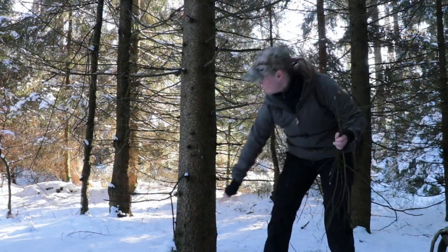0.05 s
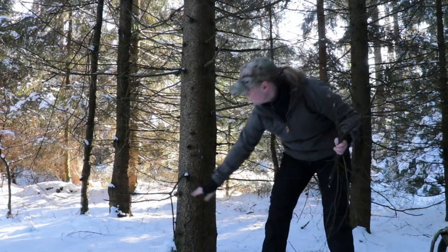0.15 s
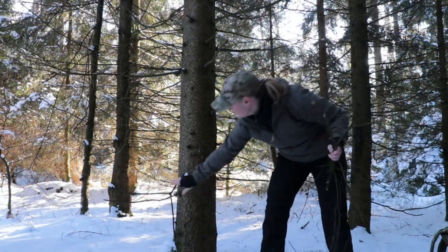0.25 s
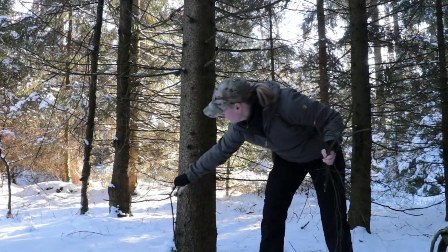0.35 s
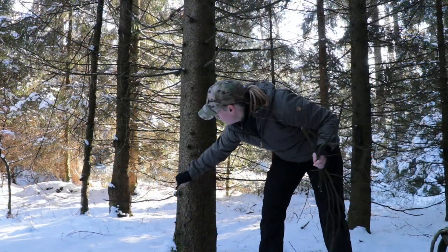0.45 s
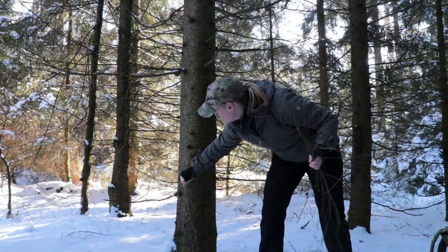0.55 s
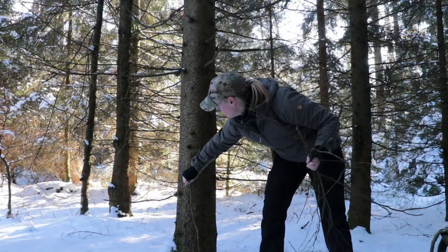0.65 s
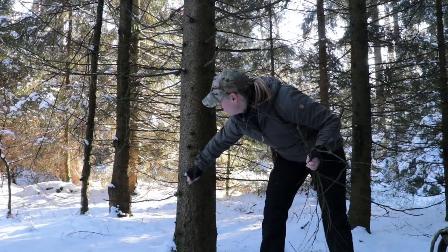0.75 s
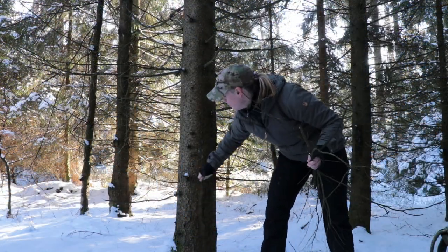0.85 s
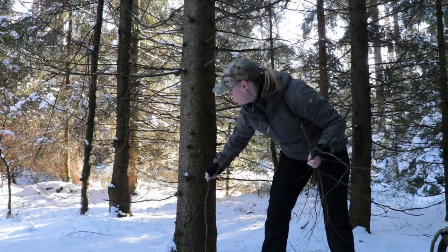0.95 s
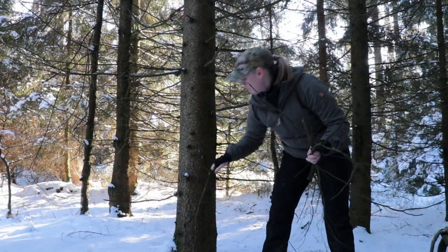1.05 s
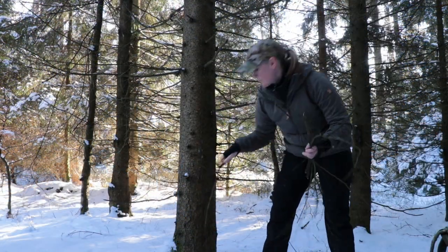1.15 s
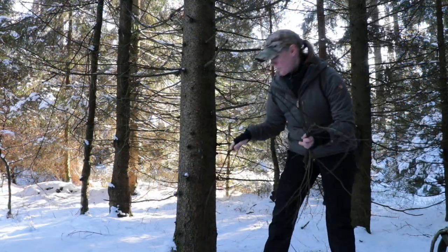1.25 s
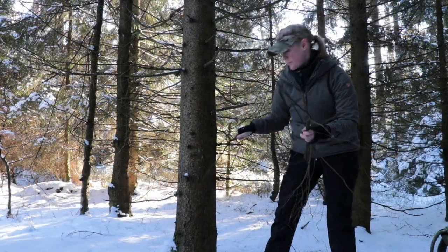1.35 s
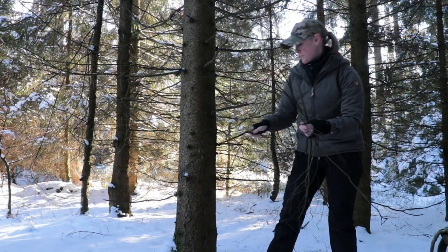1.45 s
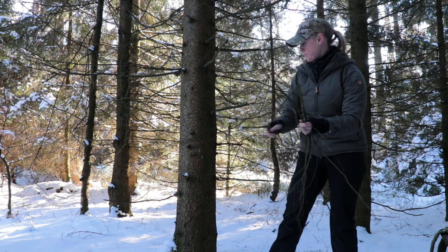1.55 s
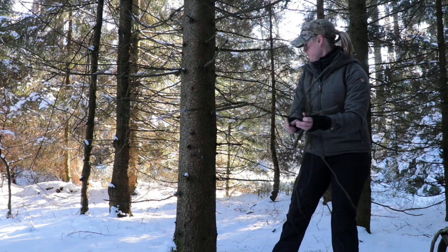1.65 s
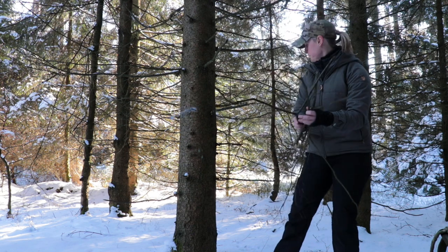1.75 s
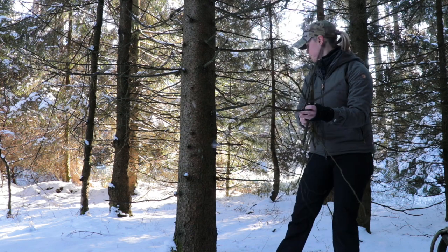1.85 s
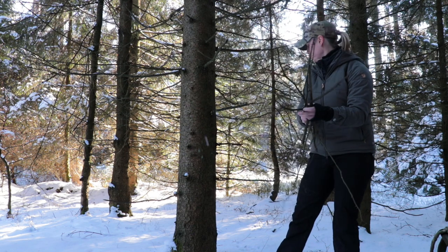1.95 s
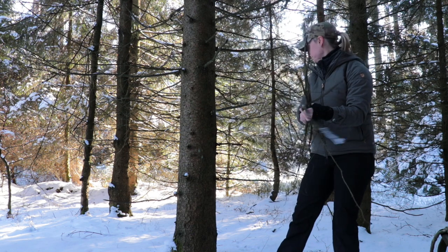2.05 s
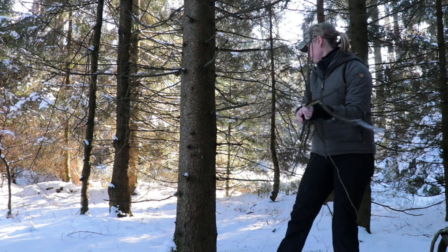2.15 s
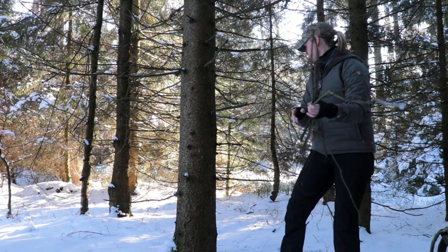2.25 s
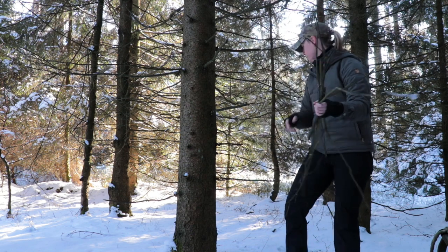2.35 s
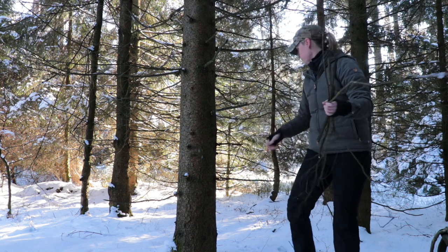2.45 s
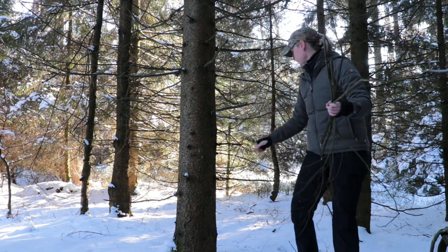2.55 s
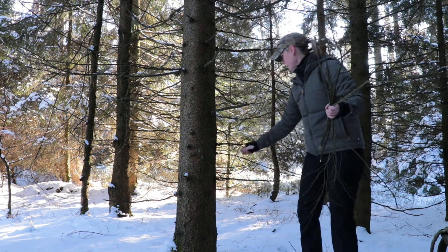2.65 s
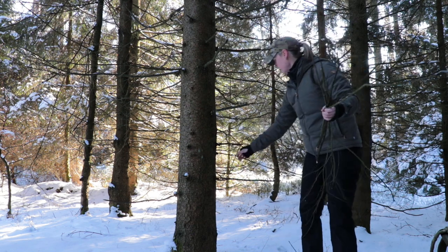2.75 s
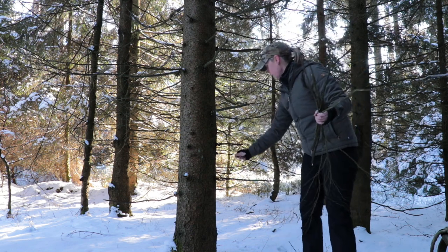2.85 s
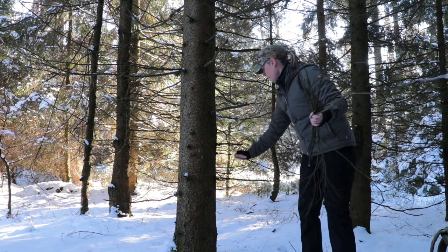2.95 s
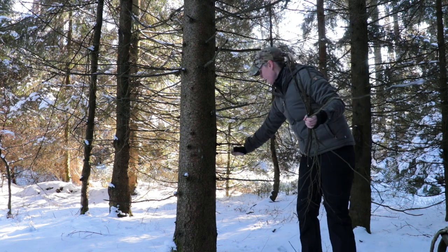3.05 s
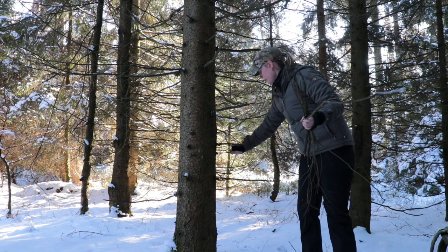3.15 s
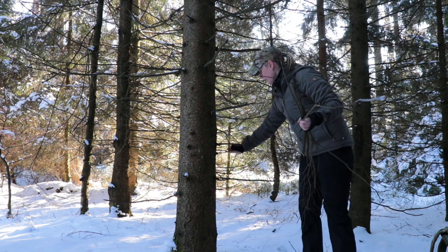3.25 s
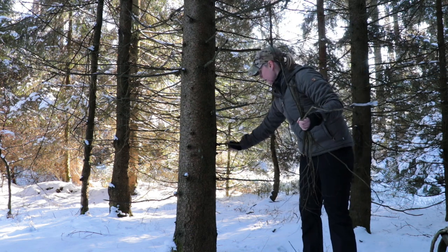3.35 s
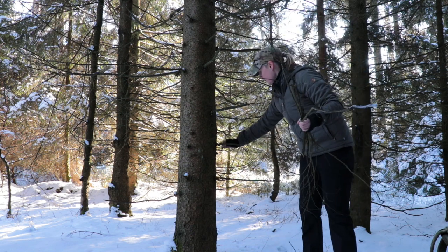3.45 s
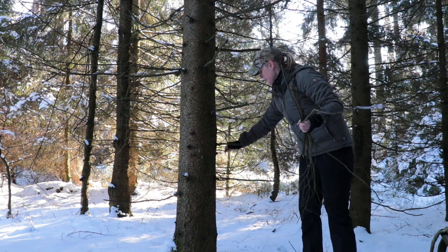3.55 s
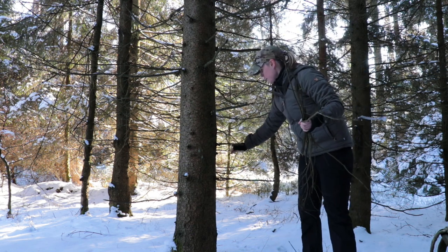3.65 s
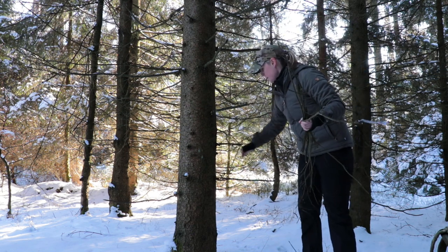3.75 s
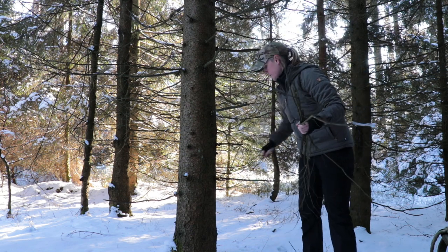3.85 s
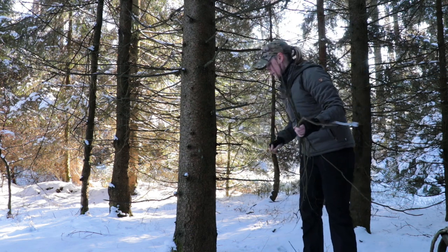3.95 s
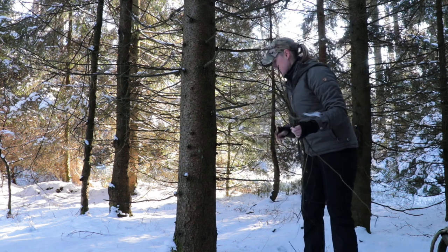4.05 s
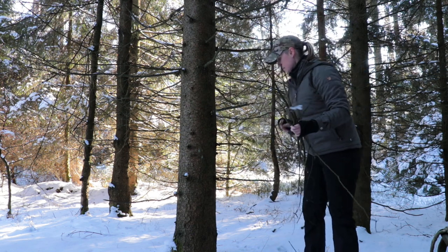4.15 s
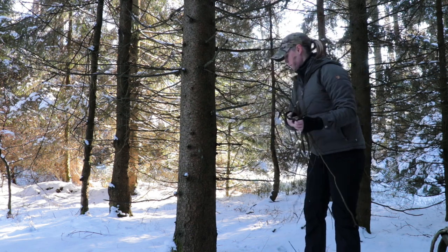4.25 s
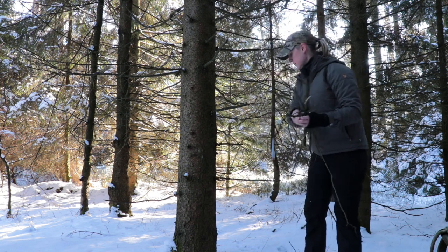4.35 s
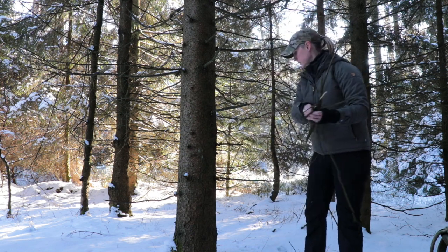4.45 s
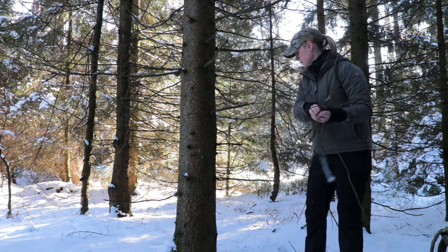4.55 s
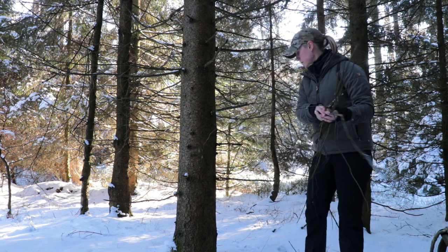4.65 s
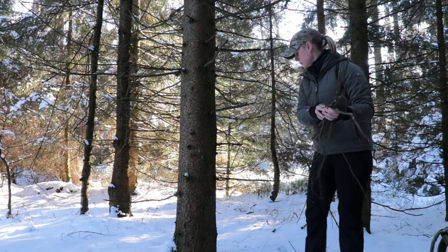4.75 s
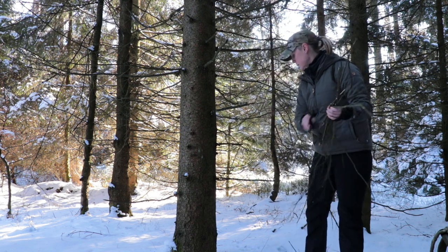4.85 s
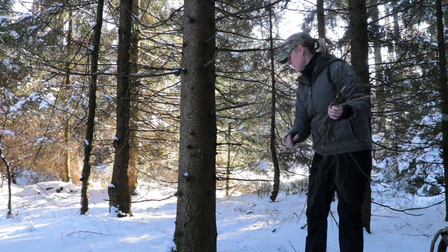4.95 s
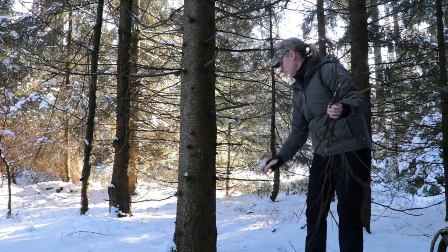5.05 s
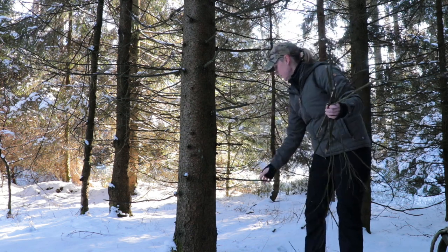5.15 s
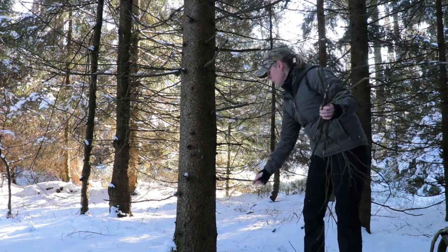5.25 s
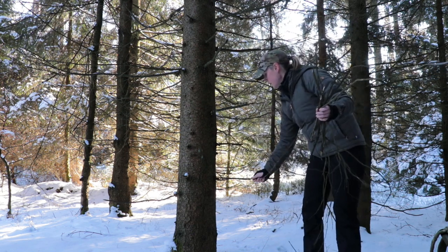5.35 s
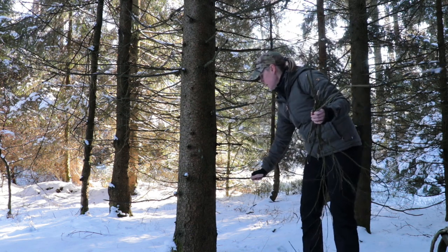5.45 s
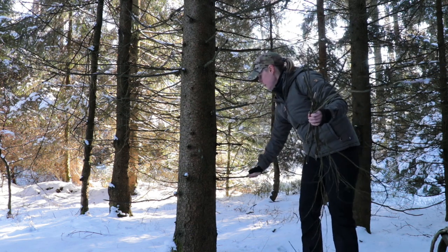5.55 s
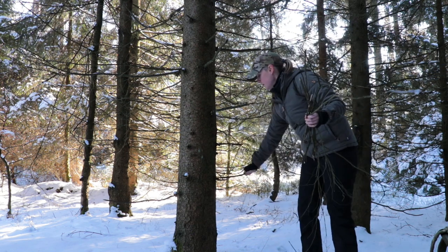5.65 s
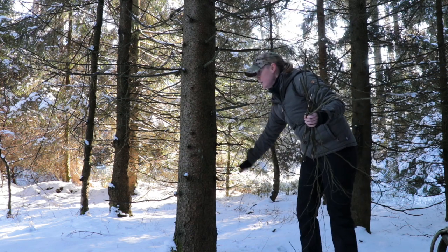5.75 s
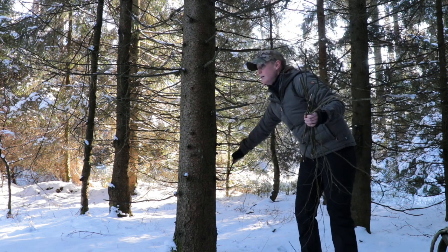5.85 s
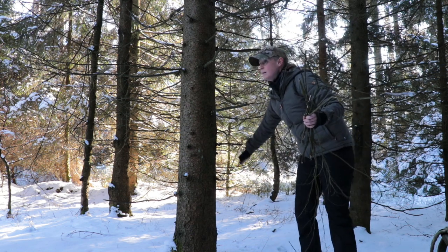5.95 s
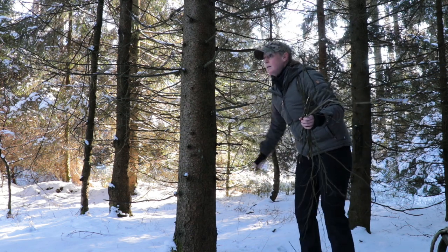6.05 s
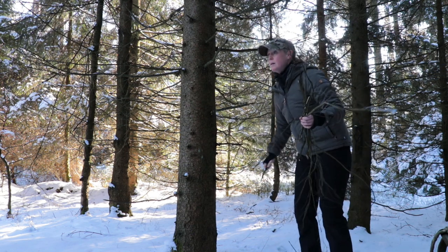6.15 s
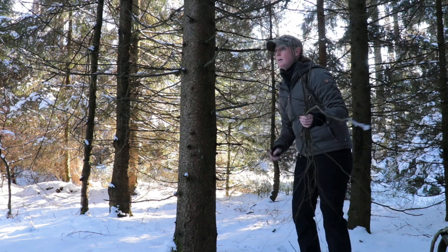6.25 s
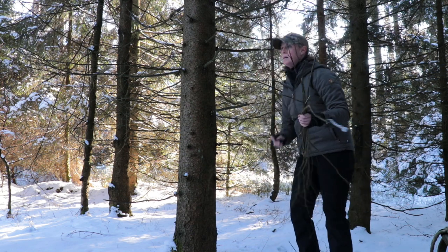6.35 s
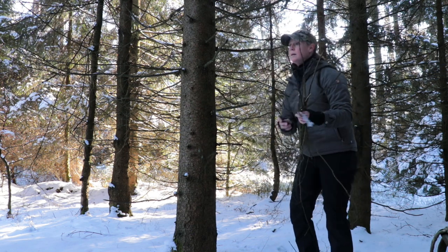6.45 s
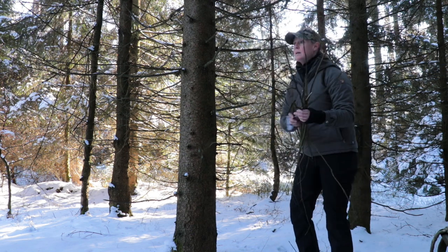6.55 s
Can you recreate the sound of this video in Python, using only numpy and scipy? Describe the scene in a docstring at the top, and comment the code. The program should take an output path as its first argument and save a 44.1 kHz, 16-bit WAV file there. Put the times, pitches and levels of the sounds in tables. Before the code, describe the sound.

Someone breaks dry twigs from a tree by hand, heard from a few metres off in a quiet winter forest. The first gives way in a short run of splintering cracks; two clean, bright snaps follow a few seconds apart, the last the loudest, each with a short echo off the trunks. In between come much quieter sounds: nylon sleeves sliding, collected twigs clicking and dull crunches of feet shifting in snow.

```python
"""Dead twigs snap off a spruce trunk a few metres away, in a still, snowy forest.
Tearing fibres ring the wood: the first twig splinters in stages, two more break with one clean
crack each, and the trunks scatter the sound back. Between the breaks a padded jacket rustles,
the gathered twigs tick against one another and boots pack the soft snow, all over a faint hush."""
import sys
import numpy as np
from scipy import signal
from scipy.fft import rfft, irfft
from scipy.io import wavfile
from scipy.ndimage import uniform_filter1d, minimum_filter1d

SR = 44100
rng = np.random.default_rng(int(sys.argv[2]) if len(sys.argv) > 2 else 0)


def log_audio(samples):
    """Write samples as a 16-bit WAV file to the path given in sys.argv[1]."""
    # one column per channel
    frames = np.atleast_2d(samples).T
    # limit to full scale, then quantise
    limited = np.clip(frames, -1, 1)
    pcm = np.round(limited * 32767).astype(np.int16)
    wavfile.write(sys.argv[1], SR, pcm)


N = 291501
TAPS = 4096
HZ = np.fft.rfftfreq(TAPS, 1 / SR)

# noise colours: frequency_hz, density_db
HUSH_COLOUR = [(15, -39), (25, -3.5), (64, 0), (281, -6), (378, -2.5), (666, -8), (1300, -8.5),
               (1850, -12.5), (2850, -13.5), (5010, -18.5), (7100, -14.5), (9810, -14.5), (13500, -20),
               (15500, -25)]  # still forest
WEIGHT_COLOUR = [(20, -23.5), (35, -14.5), (55, 1), (100, -5.5), (160, -11), (300, -33), (700, -64)]  # low rumble of shifting weight
SHUFFLE_COLOUR = [(70, -32), (170, -4), (350, 4.5), (520, -1), (750, -10.5), (1200, -28.5), (3000, -49)]  # feet stirring snow
FOLD_COLOUR = [(300, -21), (750, -1), (1300, 2.5), (2000, -5.5), (3000, -1.5), (3900, -7), (5000, -21),
               (9000, -37.5)]  # jacket creasing
NYLON_COLOUR = [(2000, -18), (4000, -6), (5200, -7.5), (6700, -1.5), (8800, -1.5), (11500, -3.5),
                (14000, -7.5), (16000, -16)]  # hiss of sliding nylon
SLEEVE_COLOUR = [(400, -16), (900, 1.5), (1500, 1.5), (2300, -1.5), (3600, -3), (5000, -14.5), (8500, -10),
                 (15000, -22)]  # sleeve on jacket
# stereo image, narrow in the bass and wide on top: frequency_hz, correlation
STEREO_LIKENESS = [(50, 0.99), (150, 0.78), (300, 0.67), (600, 0.32), (1200, 0.089), (3000, 0.056),
                   (9000, .03), (15000, 0.055)]
# reflections off the snow and nearest trunks: delay_s, level_db
EARLY_ECHOES = [(.0032, -12), (.0056, -25.5), (0.011, -28.5), (0.0167, -19), (.0222, -20)]
# decay of the forest tail: frequency_hz, t60_s
TAIL_DECAY = [(200, .2), (1500, .45), (4000, .45), (8000, 0.36), (12000, 0.3), (16000, .34)]
# tone of the forest tail: frequency_hz, gain_db
TAIL_COLOUR = [(200, -5.5), (750, 1.5), (1300, 2), (2200, 0), (4000, -2.5), (7500, -0.5), (11000, -1),
               (14000, -1), (15800, -3.5)]
# weight rolling onto one foot: peak_s, length_s, level_db
LEANS = [(0.0, 0.08, -60.5), (.26, 0.2, -58), (.9, 0.15, -67), (1.775, 0.061, -63), (2.14, 0.1, -68),
         (2.295, 0.064, -53.5), (2.68, 0.063, -56), (2.9, 0.3, -60), (3.46, 0.067, -60),
         (3.84, 0.081, -56.5), (4.16, 0.17, -59), (4.31, 0.11, -55), (4.53, .12, -68), (4.97, 0.086, -58),
         (5.96, 0.077, -57.5), (6.37, 0.095, -59), (6.485, 0.056, -54)]
# arms reaching, bending twigs and stowing them: peak_s, rise_s, fall_s, cloth_db, slide_over_fold_db
ARM_SWINGS = [(.03, 0.22, 0.49, -59.5, 0.5), (.5, 0.16, 0.18, -69.5, 7.5), (.85, 0.11, 0.28, -62, 2.5),
              (1.25, 0.15, 0.25, -61.5, -6.5), (1.7, 0.21, 0.32, -60.5, 2.5), (2.15, 0.085, 0.057, -64, -8),
              (2.72, 0.22, 0.2, -63.5, -2.5), (3.03, 0.2, 0.15, -58.5, 0), (3.3, 0.11, 0.23, -63, 0.5),
              (3.72, 0.2, 0.24, -66, -1.5), (4.18, 0.16, 0.51, -61, 1.5), (4.72, 0.098, 0.091, -69, 0),
              (4.94, 0.09, 0.063, -61.5, -5), (5.27, 0.17, 0.15, -70, 2), (6.32, 0.22, 0.21, -66, -4),
              (6.6, 0.09, .1, -71, 8.5)]
# brief sleeve scrapes: peak_s, length_s, level_db
SLEEVE_SCRAPES = [(1.555, 0.058, -52.5), (1.67, 0.052, -51.5), (1.81, 0.045, -56), (2.27, 0.073, -55),
                  (3.12, .05, -57.5), (4.185, 0.12, -59), (4.595, 0.028, -54)]
# boots pressing snow: start_s, peak_rms_db, centre_hz, fall_s
BOOT_PRESSES = [(.285, -54, 300, 0.017), (0.438, -49.5, 400, 0.0073), (0.714, -51, 220, 0.012),
                (0.803, -50.5, 220, 0.0092), (.927, -47, 257, 0.0068), (2.132, -41, 260, .0044),
                (2.275, -51, 230, 0.013), (2.75, -49, 160, 0.013), (2.855, -49, 190, 0.0056),
                (2.904, -47.5, 190, 0.007), (3.108, -50, 480, 0.015), (4.023, -47.5, 270, .0043),
                (4.296, -56, 190, 0.054), (4.422, -48.5, 450, 0.0053), (4.49, -47.5, 285, 0.019),
                (4.585, -54.5, 260, 0.024), (4.939, -52, 220, 0.0092), (6.4617, -38, 260, 0.0033)]
# twigs knocking together: start_s, level_db, knock_hz, knock_db, edge_db, pan_db
TWIG_KNOCKS = [(1.525, -52, 1500, 20, 5, -8), (1.5419, -44.5, 1500, 12, -4, -13),
               (1.771, -43.5, 1500, 1, 0, -14), (1.8119, -43, 1370, 23, 8, -12),
               (1.8247, -48, 2000, -10, 2, -15), (2.1607, -46, 2000, 8, 9, -11),
               (3.1066, -47, 3000, 9, -11, -5), (3.547, -35, 1950, 11, 5, -4),
               (3.5516, -42, 2000, -7, -3, -1), (3.69, -48, 2410, 11, -15, -2),
               (3.765, -44, 2400, 5, -8, 12), (3.978, -44, 1300, 7, 8, -2), (4.0584, -38, 1500, 1, -18, -4),
               (4.6381, -45, 1370, 24, -8, -3), (4.7178, -48, 2000, 5, -1, 12),
               (5.385, -44.5, 2700, 5.5, -4, 11.5), (5.5778, -48.5, 1990, 1.5, 9.5, 5.5),
               (6.2667, -50.5, 2900, 10, 11, -16), (6.3285, -53.5, 1600, -3, 4, -16)]
# tone of dry, splintering wood: frequency_hz, gain_db
WOOD_COLOUR = [(100, -25.5), (400, -11.5), (900, -15), (1400, -10.5), (2000, -7), (3600, -3.5), (4900, -9),
               (5700, -7), (7000, -2), (9000, -1.5), (12000, -5), (16000, -17.5)]
# stages of the first break, the row at 0.7193 s being a strong echo off the snow of the crack just before:
# start_s, level_db, fall_s, lowest_mode_hz, body_db, edge_db, pan_db
SPLINTER_STAGES = [(0.5407, -20.5, 0.0018, 214, 5.5, 6, -1), (0.5714, -36, .001, 150, -10, 1, 5),
                   (0.587, -37, .0008, 237, 6, 2, -7), (0.5938, -29, .0008, 254, 3, -4, 2),
                   (0.715, -22, 0.0014, 264, 1.5, 1.5, -2), (0.7193, -30.5, 0.0012, 397, -2, 0, -1),
                   (.732, -32, 0.00032, 274, -14, 8, 14), (0.7422, -23.5, 0.00095, 446, -21, 2, -1),
                   (0.7454, -25, .0005, 447, 4, 7, 1), (0.821, -36.5, 0.0018, 426, -1, -11, -6),
                   (.826, -28, 0.0011, 86, 1, -0.5, 5), (.8286, -29.5, 0.00056, 96, 13, 2.5, -8)]
# ringing modes of the two sticks that break cleanly: pitch_hz, width_hz, level_db
THIN_STICK_MODES = [(863, 250, -14), (1597, 340, -2), (2240, 190, -3.5), (3050, 210, -2), (3660, 297, -8.5),
                    (5460, 680, -6.5), (6460, 450, 0), (7820, 570, -0.5), (8500, 300, -1), (9160, 510, 1),
                    (10200, 600, -1.5), (11200, 265, 2), (12400, 730, 3), (14240, 450, -0.5),
                    (15300, 570, -4.5)]
THICK_STICK_MODES = [(450, 150, -13), (1500, 350, -9), (2010, 540, -2), (2970, 400, -2), (3620, 460, -3),
                     (4350, 620, -2.5), (5530, 395, -1), (6300, 510, 3.5), (7170, 300, 4.5), (7650, 270, 2),
                     (8570, 670, 4), (9860, 560, -2), (10830, 1800, 1), (12650, 1400, -3), (15000, 817, -6)]
# clean breaks, thin stick then thick: start_s, level_db, fall_s, pan_db, wet_db
CLEAN_BREAKS = [(3.3274, -9, 0.00083, -3, -12.5), (5.7196, 1.5, 0.0018, -3.5, -13)]


def amp(db):
    """Decibels to gain."""
    return 10 ** (np.asarray(db) / 20)


def unit(x):
    """Scales to rms 1."""
    return x / np.sqrt(np.mean(x ** 2) + 1e-20)


def curve(points, hz):
    """Reads a table on a log-frequency axis."""
    knots_hz, values = np.transpose(points)
    return np.interp(np.log(hz + 1), np.log(knots_hz + 1), values)


def add(mix, start_s, sound):
    """Lays a sound into the mix."""
    part = mix[:, round(start_s * SR):][:, :sound.shape[1]]
    part += sound[:, :part.shape[1]]


def panned(x, pan_db):
    """Tips the balance to the left by pan_db."""
    return x * amp([[pan_db / 2], [-pan_db / 2]])


def spread(pair, gain_at):
    """Colours two unrelated noises and draws their bass to the centre."""
    hz = np.fft.rfftfreq(pair.shape[1], 1 / SR)
    likeness = curve(STEREO_LIKENESS, hz)
    mid, side = rfft(pair) * np.sqrt([1 + likeness, 1 - likeness]) * gain_at(hz)
    return unit(irfft([mid + side, mid - side], pair.shape[1]))


def drift(rate_hz):
    """A smooth random wobble of rms 1."""
    knots = rng.standard_normal(N // 20)
    return unit(np.interp(np.arange(N) * rate_hz / SR, np.arange(len(knots)), knots))


def swells(rows):
    """Joint envelope of gestures that speed up and slow down: peak_s, rise_s, fall_s, level_db."""
    t = np.arange(N) / SR
    gestures = (amp(db) * np.exp(-((t - peak_s) / np.where(t < peak_s, rise_s, fall_s)) ** 2)
                for peak_s, rise_s, fall_s, db in rows)
    return np.sqrt(sum(gesture ** 2 for gesture in gestures) + 1e-14)


def bumps(rows):
    """Envelope of gestures that come and go evenly: peak_s, length_s, level_db."""
    return swells((peak_s, length_s / 2, length_s / 2, db) for peak_s, length_s, db in rows)


def hush(level_db=-61):
    """The bed: faint, steady air of the still forest."""
    return amp(level_db) * spread(rng.standard_normal((2, N)), lambda hz: amp(curve(HUSH_COLOUR, hz)))


def forest(source, wet_db, near_t60_s=0.12, far_db=-12, build_s=0.0023):
    """Adds echoes off snow and trunks, a fast scatter from near branches and a slower one from afar."""
    direct, outward = np.split(source, 2)
    t = np.arange(SR * 3 // 5) / SR
    bounces = rng.standard_normal((2, len(t))) * amp(4 * rng.standard_normal((2, len(t))))
    scatter = bounces * (1 - np.exp(-t / build_s))
    hz, age_s, bands = signal.stft(scatter, SR, nperseg=256)
    near = amp(-60 * age_s / near_t60_s)
    far = amp(far_db - 60 * age_s / curve(TAIL_DECAY, hz)[:, None])
    colour = amp(curve(TAIL_COLOUR, hz))[:, None]
    tail = signal.istft(bands * np.hypot(near, far) * colour, SR, nperseg=256)[1]
    response = amp(wet_db) * unit(tail) / np.sqrt(tail.shape[1])
    for delay_s, db in EARLY_ECHOES:
        bark_smear = unit(rng.standard_normal((2, 16))) / 4  # rough bark blurs each echo
        add(response, delay_s, amp(db) * bark_smear)
    return direct + signal.fftconvolve(outward, response, axes=1)[:, :N]


def rubbing(colour, envelope, flutter_hz, grain_db, pan_db, flutter_db=3):
    """Friction: countless tiny slips of uneven size, coming in clumps."""
    slips = rng.standard_normal((2, N)) * amp(grain_db * np.clip(drift(1500), -3, 3))
    texture = spread(slips, lambda hz: amp(curve(colour, hz)))
    flutter = amp(flutter_db * drift(flutter_hz))
    return panned(unit(texture * flutter) * envelope, pan_db)


def footing(swing):
    """Each lean loads the snow and each arm swing stirs the feet: a rumble and a soft shuffle."""
    lean = bumps(LEANS)
    load = np.hypot(lean, amp(-10) * swing)
    stir = np.hypot(amp(-5) * swing, amp(-10) * lean)
    weight = rubbing(WEIGHT_COLOUR, load, flutter_hz=26.6, grain_db=-2, pan_db=-0.6)
    shuffle = rubbing(SHUFFLE_COLOUR, stir, flutter_hz=67.7, grain_db=1, pan_db=3, flutter_db=5)
    return weight + shuffle


def jacket(swing, slide):
    """Padded cloth folds, its nylon shell slides and a sleeve scrapes across it."""
    folds = rubbing(FOLD_COLOUR, swing, flutter_hz=80.6, grain_db=2, pan_db=0.5)
    nylon = rubbing(NYLON_COLOUR, amp(-1) * slide, flutter_hz=111.6, grain_db=-0.5, pan_db=-1.5)
    sleeve = rubbing(SLEEVE_COLOUR, bumps(SLEEVE_SCRAPES), flutter_hz=201.5, grain_db=3, pan_db=-3)
    return folds + nylon + sleeve


def triggers(envelope, per_s, gain_db, voices=8, size_db=3):
    """Random impulses of uneven size that ride an envelope, dealt out to one track per voice."""
    chance, size, choice = rng.random(N), rng.exponential(1, N), rng.random(N)
    hits = (chance < per_s / SR) * envelope * amp(gain_db + size_db * np.minimum(size, 2))
    return [(hits * (np.floor(choice * voices) == k))[None] for k in range(voices)]


def snow_noise(length, centre_hz, steepness):
    """The dull band of noise that packing snow makes."""
    noise = rng.standard_normal((2, length))
    return spread(noise, lambda hz: hz / centre_hz / (1 + (hz / centre_hz) ** steepness))


def snow_crumbs(swing, fall_s=0.0032):
    """Small clumps of snow collapse under the boots while the body swings."""
    out, t = np.zeros((2, N)), np.arange(TAPS // 2) / SR
    tracks = triggers(swing, per_s=28, gain_db=-1)
    for collapses, clump_hz in zip(tracks, np.geomspace(260, 1040, len(tracks))):
        crunch = snow_noise(len(t), clump_hz, steepness=2.35) * np.exp(-t / fall_s)
        out += signal.oaconvolve(collapses, crunch, axes=1)[:, :N]
    return out


def boots(rise_s=0.0018, ground_hz=78, ground_fall_s=0.023, thud_db=-12):
    """A shifting boot packs the snow with a short, dull crunch, and the soft ground thuds."""
    out, t = np.zeros((2, N)), np.arange(2 * TAPS) / SR
    attack = np.minimum(t / rise_s, 1)
    for start_s, level_db, centre_hz, fall_s in BOOT_PRESSES:
        press = attack * np.exp(-np.maximum(t - rise_s, 0) / fall_s)
        snow = snow_noise(len(t), centre_hz, steepness=2.8)
        crunch = unit(snow * press) * np.sqrt(np.mean(press ** 2))
        thud_hz = ground_hz * rng.uniform(0.52, 1.5)
        thud = np.sqrt(2) * np.sin(2 * np.pi * thud_hz * t) * attack * np.exp(-t / ground_fall_s)
        add(out, start_s, amp(level_db) * (crunch + amp(thud_db) * thud))
    return out


def rod_db(bend_hz, depth_db, oval_ratio=1.37, second_share=0.37):
    """A rod's bending modes lie at squares of whole numbers; an oval twig has a second, stiffer set."""
    soft, stiff = (np.cos(2 * np.pi * np.sqrt(HZ / hz)) for hz in (bend_hz, oval_ratio * bend_hz))
    return depth_db * (soft + second_share * stiff)


def ring(burst, gain, level_db):
    """Rings a minimum-phase body with this gain over HZ; the result has the energy of 1 ms at level_db."""
    cepstrum = irfft(np.log(np.maximum(gain / gain.max(), 1e-5)))
    cepstrum[1:TAPS // 2] *= 2
    cepstrum[TAPS // 2 + 1:] = 0
    response = irfft(np.exp(rfft(cepstrum)))
    rung = signal.fftconvolve(burst, response[None], axes=1)
    energy = np.sum(rung ** 2) / 2 / (SR / 1000)
    return amp(level_db) * rung / np.sqrt(energy)


def crack(start_s, level_db, fall_s, gain, pan_db, width, lead_db, rise_s, lead_s=0.00082):
    """A few fibres give, then the rest tear in an avalanche that rings the stick.
    Returns the lead-in's start and two stereo pairs: direct, and outward into the trees."""
    t = (np.arange(TAPS // 4) - TAPS // 16) / SR
    before = np.minimum(t, 0)
    attack = np.exp(before / rise_s) + amp(lead_db) * np.exp(before / lead_s)
    avalanche = attack * np.exp(-np.maximum(t, 0) / fall_s)
    tears = rng.standard_normal((2, len(t))) * avalanche
    for _ in range(6):
        # tears are so brief that all frequencies get about the same push
        tears = irfft(np.exp(1j * np.angle(rfft(tears))))
        tears *= avalanche / np.sqrt(abs(uniform_filter1d(tears ** 2, size=24, axis=1)) + 1e-12)
    # only short waves differ between left and right
    side = width * signal.lfilter(*signal.butter(1, 6000, "high", fs=SR), tears[1])
    burst = np.array([tears[0] + side, tears[0] - side])
    # each mode radiates its own way, so the sum over all directions is smoother
    all_round = np.sqrt(abs(uniform_filter1d(gain ** 2, size=121))) * HZ / np.hypot(HZ, 700)
    direct = panned(ring(burst, gain, level_db), pan_db)
    outward = panned(ring(burst, all_round, level_db), pan_db / 2)
    return start_s + t[0], np.vstack([direct, outward])


def twig_bundle(slide):
    """The gathered twigs scratch one another, harder as the jacket moves more."""
    out = np.zeros((4, N))
    tracks = triggers(slide, per_s=45, gain_db=3)
    for knocks, bend_hz in zip(tracks, np.geomspace(90, 480, len(tracks))):
        gain = amp(curve(WOOD_COLOUR, HZ) + rod_db(bend_hz, depth_db=6)) / np.hypot(1, HZ / 5000)
        _, tick = crack(start_s=0, level_db=0, fall_s=0.00049, gain=gain, pan_db=-2,
                        width=0.75, lead_db=-14.5, rise_s=0.0001)
        out += signal.oaconvolve(knocks, tick, axes=1)[:, :N]
    return out


def twig_knocks(fall_s=0.0006, typical_bend_hz=242.7, knock_octaves=0.78):
    """Dry twigs knock as they are pulled free and gathered: thick ones woody, thin ones bright."""
    out = np.zeros((4, N))
    bends_hz = typical_bend_hz * rng.uniform(0.5, 1.6, len(TWIG_KNOCKS))
    for (start_s, level_db, knock_hz, knock_db, edge_db, pan_db), bend_hz in zip(TWIG_KNOCKS, bends_hz):
        body_db = knock_db * np.exp(-(np.log2((HZ + 1) / knock_hz) / knock_octaves) ** 2)
        shelf_db = curve([(7500, 0), (14500, edge_db)], HZ)
        gain = amp(curve(WOOD_COLOUR, HZ) + body_db + shelf_db + rod_db(bend_hz, depth_db=4.5))
        add(out, *crack(start_s, level_db, fall_s, gain, pan_db, width=0.44, lead_db=-9.5, rise_s=12e-5))
    return out


def splintering_twig():
    """Bundle after bundle of fibres gives way; the bending modes change as the twig comes loose."""
    out = np.zeros((4, N))
    for start_s, level_db, fall_s, bend_hz, body_db, edge_db, pan_db in SPLINTER_STAGES:
        eq_db = curve([(300, 0), (1600, body_db), (3500, body_db / 4), (7000, 0), (13000, edge_db)], HZ)
        gain = amp(curve(WOOD_COLOUR, HZ) + eq_db + rod_db(bend_hz, depth_db=2))
        add(out, *crack(start_s, level_db, fall_s, gain, pan_db, width=0.73, lead_db=-5.5, rise_s=11e-5))
    return out


def clean_snap(start_s, level_db, fall_s, pan_db, modes, floor_db=-26):
    """The stick breaks in one sharp crack that rings its bending modes."""
    power = sum(amp(db) ** 2 / (1 + ((HZ - pitch_hz) / width_hz * 1.4) ** 2) ** 2
                for pitch_hz, width_hz, db in modes)
    gain = np.sqrt(power + amp(floor_db) ** 2) * HZ / np.hypot(HZ, 400)
    out = np.zeros((4, N))
    add(out, *crack(start_s, level_db, fall_s, gain, pan_db, width=0.47, lead_db=-25, rise_s=8e-5))
    return out


def scene():
    """Twigs with forest echo, over dry snow and cloth foley and the hush."""
    swing = swells(row[:4] for row in ARM_SWINGS)
    slide = swells((*timing, cloth_db + slide_db) for *timing, cloth_db, slide_db in ARM_SWINGS)
    out = forest(splintering_twig() + twig_knocks() + twig_bundle(slide), wet_db=-7)
    out += boots() + snow_crumbs(swing) + footing(swing) + jacket(swing, slide) + hush()
    for (*snap, wet_db), modes in zip(CLEAN_BREAKS, (THIN_STICK_MODES, THICK_STICK_MODES)):
        out += forest(clean_snap(*snap, modes), wet_db)
    return out


def record(dry, low_cut_hz=38, top_hz=16300):
    """Low cut, a fast limiter that holds the loudest crack at full scale, then a steep high cut."""
    thinned = signal.sosfilt(signal.butter(2, low_cut_hz, "high", fs=SR, output="sos"), dry)
    allowed_gain = 1 / np.maximum(abs(thinned), 1)
    held_gain = minimum_filter1d(allowed_gain, size=13, axis=1)
    limited = thinned * uniform_filter1d(held_gain, size=13, axis=1)
    low_pass = signal.firwin(255, top_hz, window=("kaiser", 8), fs=SR)
    return signal.oaconvolve(limited, low_pass[None], "same", axes=1)


dry = scene()
out = record(dry)
log_audio(out)
```